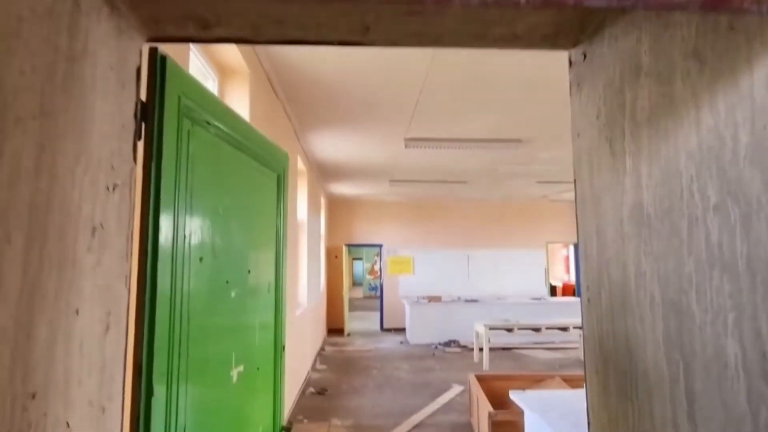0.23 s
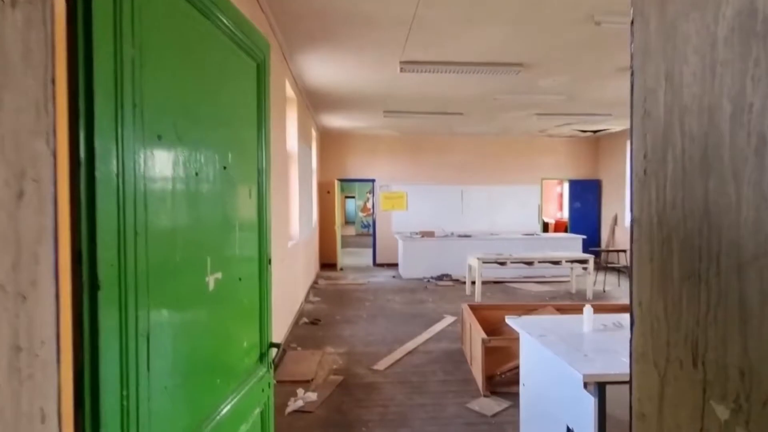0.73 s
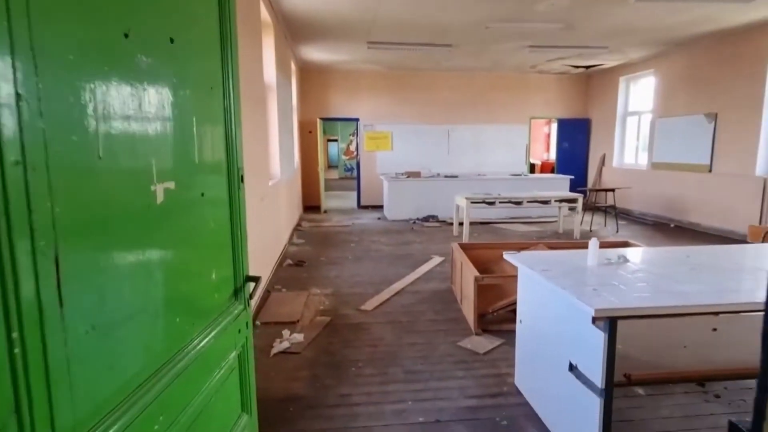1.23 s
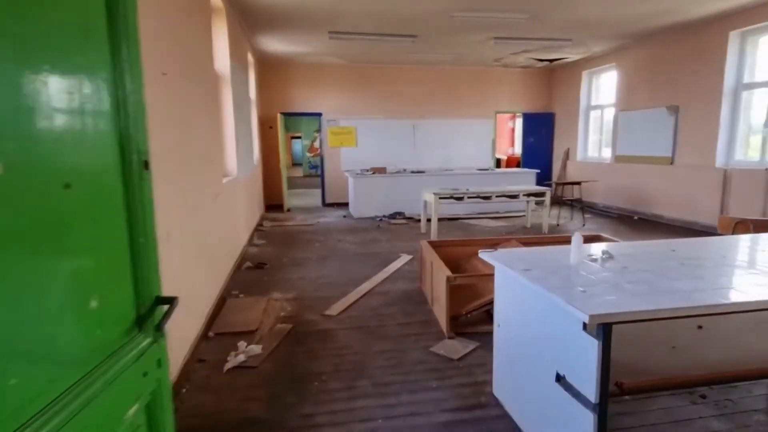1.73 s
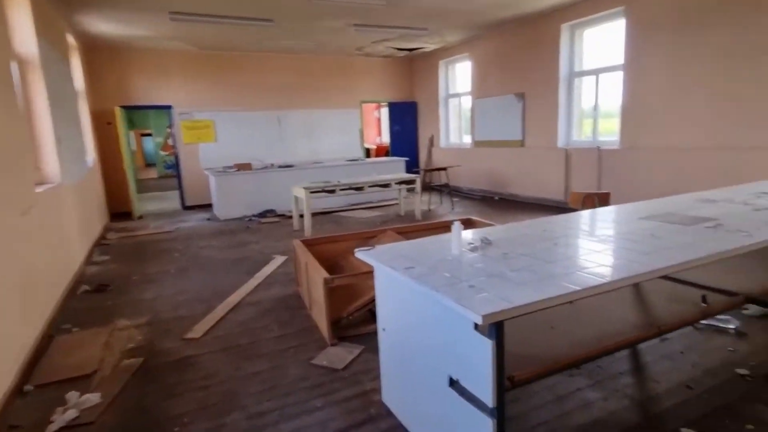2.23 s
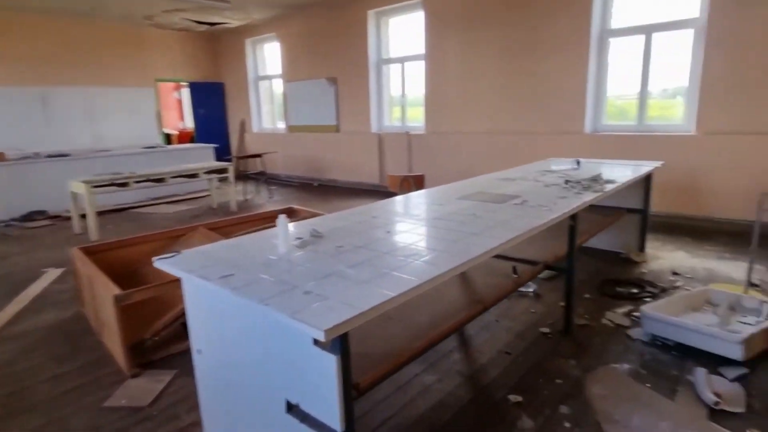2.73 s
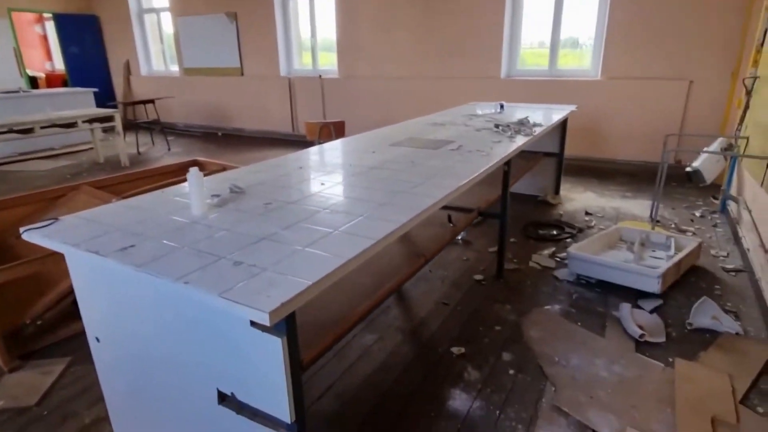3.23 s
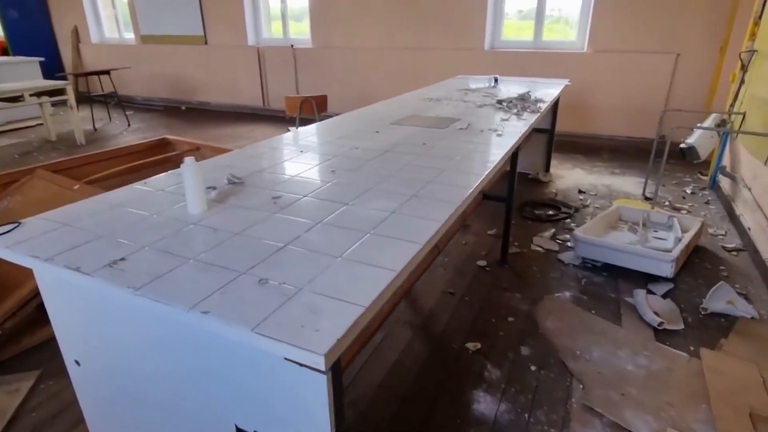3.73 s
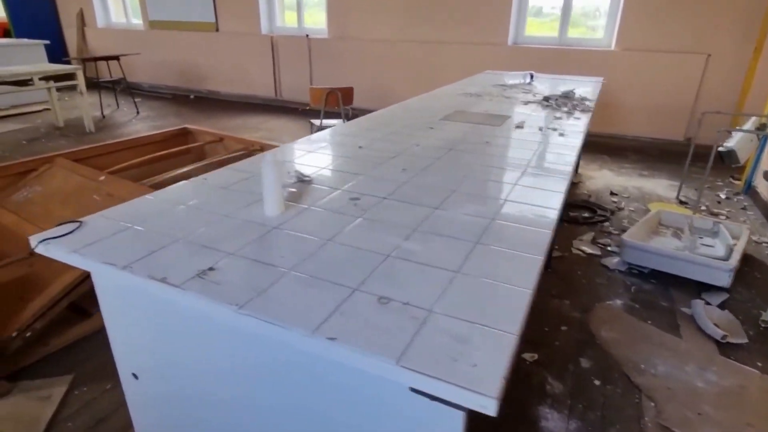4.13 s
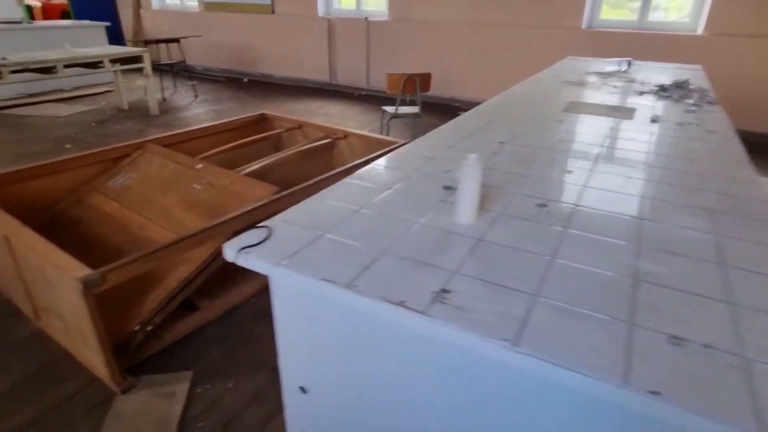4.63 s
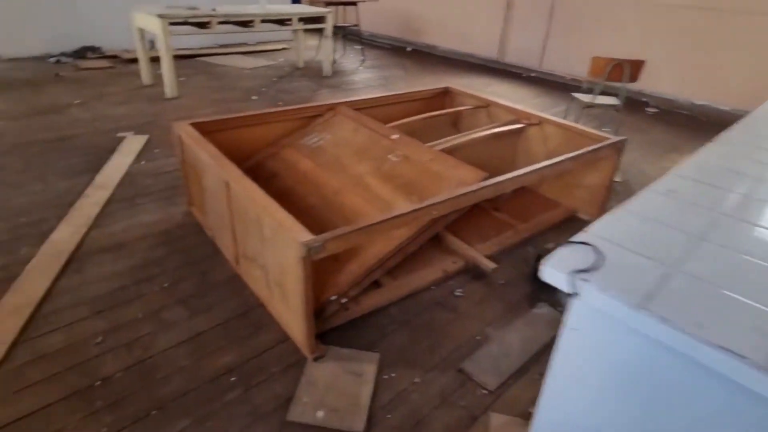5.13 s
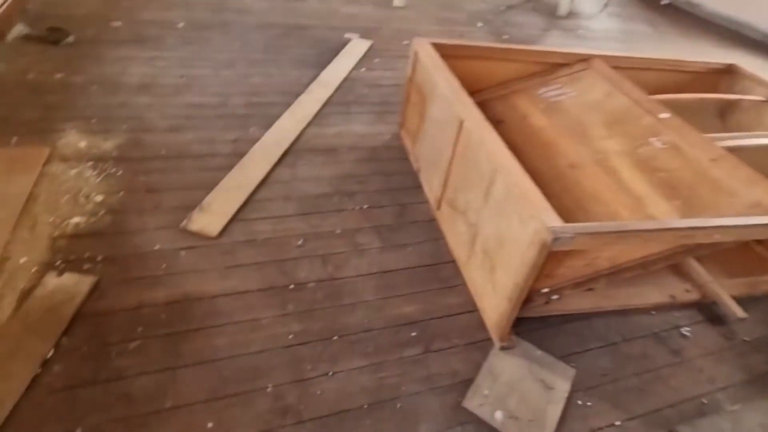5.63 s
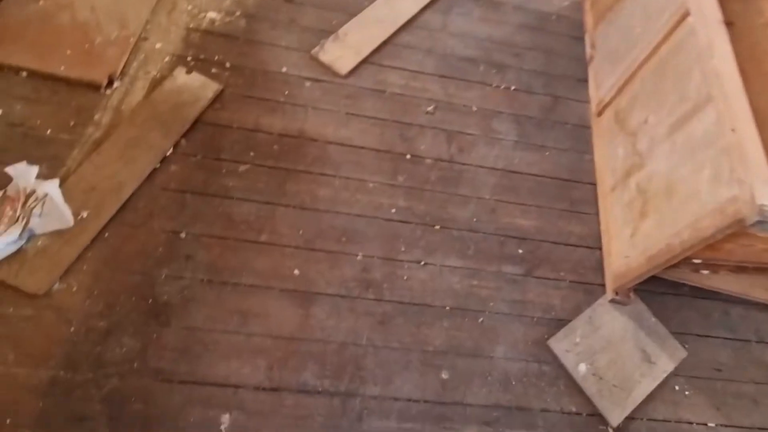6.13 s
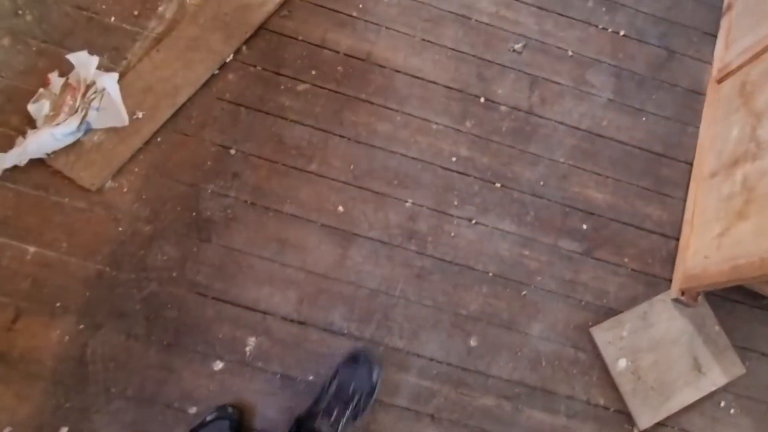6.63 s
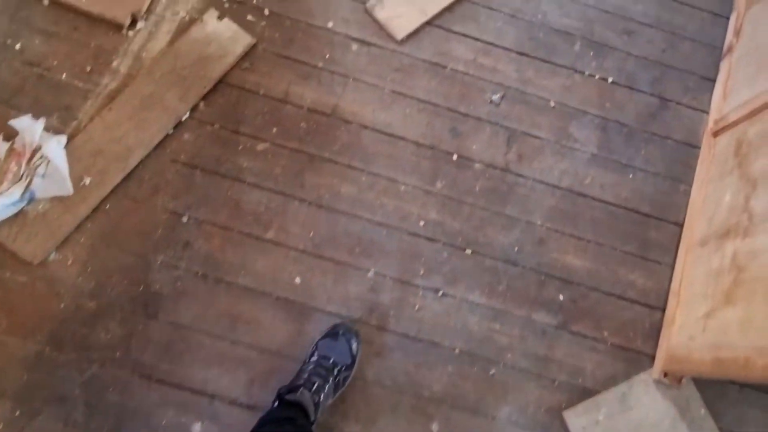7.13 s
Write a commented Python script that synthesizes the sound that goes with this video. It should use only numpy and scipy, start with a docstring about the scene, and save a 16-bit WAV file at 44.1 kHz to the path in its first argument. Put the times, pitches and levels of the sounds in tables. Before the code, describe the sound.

Someone walks through an echoing abandoned room: faint sliding soles and clothes rustle, booming plank knocks, sharp wooden clacks, then quieter steps and grit.

```python
"""Soft shuffling steps in a large empty room, then heavy ones on loose floorboards, then softer ones again.
Each footfall is a burst of noise for the knock on the floor and a decaying sine for the board under it.
Filtered noise makes the sliding soles, clothes, scrapes and room air; tiny bursts make grit and cracking joints.
Bare walls answer for about a second with fading noise. The bass is nearly mono, the treble is spread."""
import sys
import numpy as np
from scipy import signal
from scipy.fft import rfft, irfft, next_fast_len
from scipy.io import wavfile
from scipy.ndimage import uniform_filter1d, map_coordinates

SR = 44100
rng = np.random.default_rng(int(sys.argv[2]) if len(sys.argv) > 2 else 0)


def generate_wav(sig):
    """Save sig (samples, or channels by samples) to the path in sys.argv[1] as 16-bit PCM at SR."""
    pcm = np.round(np.clip(np.atleast_2d(sig).T, -1, 1) * 32767).astype(np.int16)
    wavfile.write(sys.argv[1], SR, pcm)


N = 326340  # length in samples

# Spectrum of the quiet room. Each row: frequency in Hz, relative density in dB per Hz.
AIR_SPECTRUM = [(25, -14), (65, 5.5), (110, -6), (220, -5.5), (480, -11.5), (800, -18), (1300, -20),
                (2200, -28), (4000, -32.5), (9000, -35), (15800, -38)]
# Stereo spread of the room air. Each row: frequency in Hz, side gain in dB.
AIR_SIDE_GAIN = [(200, -48), (1100, -38), (2000, -23), (3200, -14), (5000, -9), (10000, -4), (14000, -8)]
# Stereo spread of the steps and slides. Each row: frequency in Hz, side gain in dB.
STEP_SIDE_GAIN = [(200, -50), (1400, -42), (2800, -26), (4500, -11), (9000, -2), (14000, -6)]

# Decay of the room. Each row: frequency in Hz, time to fall by 60 dB in seconds.
ROOM_DECAY = [(80, 1.82), (200, 0.6), (500, 1.096), (1500, 0.96), (3500, 0.91), (7000, 0.75), (14000, 0.17)]
# Strength of the echo off the walls. Each row: frequency in Hz, relative level in dB.
WALL_ECHO = [(60, -15), (130, 11), (300, -1.5), (700, 2.5), (2000, 0.5), (6000, -1.5), (14000, 12)]

# A foot slides and the clothes move with it.
# Each row: start in seconds, length in seconds, sole level in dB, rustle level in dB, both before a common trim.
SLIDES = [(0, 0.2, -51.5, -57.5), (0.37, 0.17, -55.5, -53), (0.862, 0.038, -54, -48.5),
          (1.02, 0.13, -53.5, -55), (1.184, 0.14, -59, -51), (1.31, 0.073, -50, -67),
          (1.603, 0.12, -56.5, -70), (1.745, 0.035, -67, -52), (1.835, 0.12, -48.5, -53.5),
          (1.98, 0.11, -74, -52.5), (2.492, 0.2, -45.5, -56), (2.753, 0.19, -41.5, -47.5),
          (3.22, 0.78, -50, -55.5), (5.22, 0.39, -53, -56), (5.558, 0.026, -46, -55.5),
          (5.894, 0.13, -55.5, -83), (6.24, 0.18, -58, -59), (6.733, 0.21, -50, -85),
          (7.224, 0.045, -63, -78)]
# Spectrum of the sliding sole. Each row: frequency in Hz, relative density in dB per Hz.
SOLE_SPECTRUM = [(71, -32), (120, 5), (248, -2.5), (323, 2.5), (358, -12.5), (479, 3.5), (940, -9.5),
                 (2500, -32.5), (3250, -60), (5500, -120)]
# Spectrum of the clothes. Each row: frequency in Hz, relative density in dB per Hz.
RUSTLE_SPECTRUM = [(900, 11), (2300, 3), (4000, -4), (7500, -9), (11000, -13), (16000, -26.5)]
SLIDE_ATTACK_S, SLIDE_FADE_DB_PER_S = 0.023, 54.5

# Hollow scrapes of a dragged sole. Each row: start in seconds, length in seconds, level in dB.
SCRAPES = [(1.28, 0.55, -52), (6.757, 0.5, -58.5)]
# Resonances of the boards under a scrape. Each row: pitch in Hz, width in Hz, relative level in dB.
SCRAPE_MODES = [(470, 50, 2), (760, 130, 2.5), (1370, 150, -3)]

# Slaps and scrapes of the sole as it settles.
# Each row: start in seconds, level in dB, stroke length in seconds, pitch in Hz.
SCUFFS = [(0.372, -60.5, 0.17, 2620), (0.882, -52.5, 0.048, 580), (0.884, -60, 0.026, 2200),
          (1.196, -65, 0.045, 4200), (1.971, -59.5, 0.015, 4750), (2.048, -57, 0.025, 1970),
          (2.733, -36.5, 0.023, 550), (2.751, -42, 0.015, 1400), (2.787, -39.5, 0.048, 593),
          (3.07, -50, 0.0056, 3230), (3.07, -43, 0.012, 1085), (3.094, -44.5, 0.029, 1070),
          (3.371, -49, 0.011, 1060), (3.4, -53.5, 0.052, 960), (3.701, -28, 0.0046, 910),
          (4.527, -21.5, 0.0073, 654), (4.562, -39.5, 0.16, 1600), (5.176, -24, 0.0031, 1400),
          (5.177, -41.5, 0.032, 1550), (5.181, -55, 0.027, 4150), (6.24, -41.5, 0.011, 810),
          (6.554, -45, 0.017, 667), (7.211, -49.5, 0.032, 620), (7.294, -55, 0.051, 575)]
SCUFF_WIDTH = 0.72  # bandwidth over pitch

# Crumbs cracking, and at 2.869 s one sharp tick close on one side. Each row: start in seconds, peak level in dB
# before a common lift, # left-minus-right level in dB, pitch in Hz, time constant in seconds.
GRIT = [(0.941, -47, 4, 3400, 0.0051), (1.191, -53, 11, 4500, 0.004), (1.773, -53.5, -1, 3900, 0.0064),
        (2.746, -42, -2, 3500, 0.0015), (2.869, -39, 9, 3900, 0.0024), (3.232, -39.5, -1, 3700, 0.0022),
        (3.32, -62, 1, 2600, 0.0015), (3.621, -45.5, 0.5, 2800, 0.0015), (4.838, -43, 1, 4800, 0.002),
        (5.522, -35.5, 0.5, 4800, 0.0016), (6.307, -45.5, 0, 3400, 0.0018)]
# Plank joints snapping. Each row: start in seconds, level in dB, pitch in Hz.
CRACKS = [(3.7005, -28, 3040), (3.836, -41.5, 3060), (4.5235, -31, 3750), (6.247, -45, 2340)]

# Footfalls, heel and sole. Each row: start in seconds, knock level in dB,
# softness of the contact in milliseconds, name of the board, board level in dB.
STEPS = [(1.05, -47, 0.92, "boom", -52), (1.136, -48.5, 0.54, "bump", -35),
         (1.324, -53, 0.34, "rap", -37.5), (2.057, -51, 0.15, "rap", -37.5), (2.294, -55, 1, "rap", -43),
         (2.730, -30, 0.57, "boom", -6), (2.735, -44, 0.29, "drum", -4.5), (2.751, -35, 0.1, "knock", -14),
         (2.796, -40, 0.46, "boom", -15.5), (2.871, -36, 0.082, "boom", -14),
         (3.070, -36.5, 0.13, "tock", -15), (3.079, -33, 0.43, "flex", -26),
         (3.148, -36.5, 0.79, "knock", -32), (3.371, -36.5, 0.23, "knock", -20.5),
         (3.38, -39, 0.28, "ring", -38), (3.414, -33, 0.96, "bump", -37), (3.452, -45.5, 0.13, "bump", -23),
         (3.700, -19, 0.078, "ring", -5.5), (3.703, -53, 0.18, "flex", -11.5),
         (3.837, -24.5, 0.24, "rap", -8.5), (3.839, -37, 0.19, "boom", -22),
         (3.854, -24.5, 0.84, "thud", -20), (4.402, -43.5, 0.48, "thud", -31),
         (4.443, -43.5, 0.067, "bump", -21), (4.453, -44, 0.49, "thud", -20.5),
         (4.5237, -17.5, 0.025, "ring", -16.5), (4.526, -17.5, 0.091, "clack", -3),
         (4.526, -29, 0.094, "clop", -6.5), (4.536, -22, 0.072, "clack", -10),
         (4.542, -31, 0.27, "thump", -11), (5.175, -21, 0.1, "knock", -9),
         (5.177, -33.5, 0.064, "clack", -12.5), (5.184, -27, 0.077, "rap", -12.5),
         (5.474, -35, 0.68, "knock", -28), (5.579, -43, 0.91, "knock", -24.5),
         (5.584, -40, 0.55, "rumble", -23), (6.158, -48, 0.21, "clack", -52),
         (6.184, -49.5, 0.2, "bump", -35), (6.234, -34, 0.16, "thump", -20),
         (6.236, -59, 0.21, "clack", -32.5), (6.373, -43, 0.24, "bump", -31.5),
         (6.559, -49.5, 0.17, "bump", -33), (7.186, -52, 0.31, "rumble", -26.5),
         (7.218, -44, 0.23, "ring", -39.5)]
# Ways the floorboards ring. Each name gives: pitch in Hz, time to fall by 60 dB in seconds.
BOARDS = {"rumble": (81, 0.091), "drum": (93.5, 0.12), "boom": (108, 0.17), "thud": (158, 0.25),
          "bump": (170, 0.081), "thump": (252, 0.078), "knock": (245, 0.085), "rap": (276.8, 0.092),
          "flex": (296, 0.094), "ring": (355, 0.15), "tock": (420, 0.023), "clop": (520, 0.026),
          "clack": (700, 0.028)}
# Colour of the floor's knock. Each row: frequency in Hz, relative level in dB.
WOOD_SPECTRUM = [(40, -16), (110, -10), (230, 2), (450, 0.5), (750, -3), (1100, -5.5), (2000, -10.5),
                 (3200, -15.5), (4300, -22), (8000, -27), (11000, -24.5), (15000, -26)]
# Upper resonances of the floor. Each entry: frequency in Hz.
FLOOR_MODES_HZ = [406, 712, 883, 960, 1121, 1290, 1437, 1577, 1666, 1856, 1993, 2263, 2380, 2605]
MODE_LIFT_DB, MODE_WIDTH_HZ = 2, 3.5

TOP_HZ = 15800  # upper band limit


def amp(db):
    """Decibels to gain."""
    return 10 ** (np.asarray(db) / 20)


def unit(x):
    """Scale to rms 1."""
    return x / np.sqrt(np.mean(x ** 2) + 1e-20)


def along(points, hz):
    """Read (Hz, value) points on a log frequency axis."""
    f, v = np.transpose(points)
    return np.interp(np.log(hz + 1), np.log(f + 1), v)


def wobble(rate, size=N):
    """A smooth random curve, rate knots a second."""
    knots = rng.standard_normal(int(size * rate / SR) + 4)
    return map_coordinates(knots, [np.arange(size) * rate / SR])


def colour(x, gain):
    """Causal minimum-phase filter whose gain is a function of frequency."""
    n = x.shape[-1]
    m = 2 * next_fast_len(n // 2 + SR // 10)
    log_gain = np.log(np.maximum(gain(np.fft.rfftfreq(m, 1 / SR)), 1e-6))
    # folding the cepstrum onto positive time makes the filter causal
    cepstrum = irfft(log_gain, m)
    cepstrum[1:m // 2] *= 2
    cepstrum[m // 2 + 1:] = 0
    return irfft(rfft(x, m) * np.exp(rfft(cepstrum)), m)[..., :n]


def band(pitch_hz, width):
    """Gain of a broad resonance with steep skirts; width is bandwidth over pitch."""
    return lambda hz: np.hypot(1, (hz / pitch_hz - pitch_hz / (hz + 1)) / width) ** -3


def noise(spectrum, patchy_db=0):
    """Mid and side noise of rms 1 with the given spectrum; its colour drifts in patches."""
    z = signal.stft(rng.standard_normal((2, N)), nperseg=512)[2]
    field = rng.standard_normal(z.shape[1:])
    field = uniform_filter1d(field, size=7, axis=0)   # smooth over frequency
    field = uniform_filter1d(field, size=12, axis=1)  # smooth over time
    patchy = signal.istft(z * amp(patchy_db * unit(field)), nperseg=512)[1][:, :N]
    return unit(colour(patchy, lambda hz: amp(along(spectrum, hz))))


def add(track, s, sound):
    """Mix a sound into the track at time s, in seconds."""
    part = track[:, round(s * SR):][:, :sound.shape[-1]]
    part += sound[:, :part.shape[-1]]


def echoes(build_s=0.022, first_echo_s=0.00074):
    """Mid and side of the room's answer: fading noise, treble dying soonest, drawn afresh for every sound."""
    hz, t, z = signal.stft(rng.standard_normal((2, SR)), SR, nperseg=256)
    strength_db = along(WALL_ECHO, hz)[:, None]
    decay_db = 60 * t / along(ROOM_DECAY, hz)[:, None]
    tail = signal.istft(z * amp(strength_db - decay_db), SR, nperseg=256)[1]
    # echoes thicken as more and more walls are reached
    since_first = np.maximum(np.arange(tail.shape[1]) / SR - first_echo_s, 0)
    return tail * (1 - np.exp(-since_first / build_s))


def in_room(direct, spread, wet_db):
    """Mid and side: the direct sound plus the echoes of what spreads out in all directions."""
    heard = signal.fftconvolve(spread[None], echoes(), axes=1)
    # wet_db sets the mid echo energy against the direct energy
    heard *= amp(wet_db) * np.linalg.norm(direct) / np.linalg.norm(heard[0])
    heard[0, :len(direct)] += direct
    return heard


def burst(envelope, gain, wet_db):
    """Many tiny contacts under an envelope, coloured by gain and heard in the room; direct energy 1."""
    contacts = envelope * rng.standard_normal(len(envelope))
    # even out the chance tilt of the noise so that gain alone sets the colour
    power = np.abs(rfft(contacts, SR)) ** 2  # one bin per Hz
    broad = np.abs(uniform_filter1d(power, size=300)) / power.mean()
    even = lambda hz: np.interp(hz, np.arange(len(broad)), broad + .05) ** -.5
    chatter = colour(contacts, lambda hz: gain(hz) * even(hz))
    one_contact = colour(signal.unit_impulse(len(envelope)), gain)
    return in_room(chatter / np.linalg.norm(chatter), one_contact, wet_db)


def air(level_db=-53.0):
    """The low rumble of the building and a thin hiss: coloured noise with a slight waver in level."""
    return amp(level_db + 0.58 * wobble(33)) * noise(AIR_SPECTRUM)


def shuffle(sole_db=-1, rustle_db=-1, grain_db=2.0):
    """Soles slide on dust and clothes rustle: noise starts quickly, holds and fades, in uneven little catches."""
    t = np.arange(N) / SR
    power = np.zeros((2, N))
    for s, length, slide_db, cloth_db in SLIDES:
        attack = np.clip((t - s) / SLIDE_ATTACK_S, 0, 1)
        stroke = attack * amp(-SLIDE_FADE_DB_PER_S * np.maximum(t - s - length, 0))
        power += (amp([[slide_db], [cloth_db]]) * stroke) ** 2
    slide, rustle = np.sqrt(power)
    slide = slide * amp(sole_db + 0.66 * wobble(35)) * noise(SOLE_SPECTRUM, patchy_db=2.0)
    cloth = unit(amp(grain_db * wobble(600)) * noise(RUSTLE_SPECTRUM, patchy_db=2.2))
    return slide + rustle * amp(rustle_db) * cloth


def hollow_scrape(attack_s=0.046, fade_db_per_s=22, release_db_per_s=70):
    """A dragged sole rubs the boards, which answer in a few narrow resonances."""
    stroke = np.zeros(N)
    for s, length, db in SCRAPES:
        t = np.arange(N) / SR - s
        fade_db = fade_db_per_s * np.maximum(t, 0)
        release_db = release_db_per_s * np.maximum(t - length, 0)
        stroke += np.clip(t / attack_s, 0, 1) * amp(db - fade_db - release_db)

    def boards_gain(hz):
        return sum(amp(level) * band(pitch, width / pitch)(hz) for pitch, width, level in SCRAPE_MODES)

    rubbing = unit(colour(rng.standard_normal((2, N)), boards_gain))
    return amp(0.83 * wobble(25.4)) * stroke * rubbing


def rub(length, pitch_hz, width, grain_db=2.0):
    """A gritty stroke that swells quickly and fades, through one resonance; length in seconds."""
    t = np.arange(SR * 2 // 3) / SR
    u = t[t < 4 * length + .03] / length
    stroke = u * np.exp(-np.pi * u) * amp(grain_db * wobble(630, size=len(u)))
    return np.sqrt(length * SR) * burst(stroke, band(pitch_hz, width), wet_db=-8.5)


def scuffs():
    """Broad slaps and scrapes of the soles: each is one rub through its own resonance."""
    track = np.zeros((2, N))
    for s, db, length, pitch_hz in SCUFFS:
        add(track, s, amp(db) * rub(length, pitch_hz, SCUFF_WIDTH))
    return track


def grit(level_db=4, width=2.9, dull_hz=8000, floor_hz=1100, floor_db=0):
    """Crumbs of plaster crack close by under the soles, and one sharp tick sounds close on one side; each
    unevenly coloured and panned; left and right."""
    track = np.zeros((2, N))
    t = np.arange(SR // 20) / SR
    grid = np.arange(0, SR / 2, 450)
    for s, db, pan_db, pitch_hz, life in GRIT:
        ripple_db = 4.5 * rng.standard_normal(len(grid))

        def gain(hz):
            # the crumb snaps and taps the floor under it
            body = band(pitch_hz, width)(hz) + amp(floor_db) * band(floor_hz, width)(hz)
            return body * amp(np.interp(hz, grid, ripple_db)) / np.hypot(1, (hz / dull_hz) ** 2)

        mid, side = burst(t / life * np.exp(-t / life), gain, wet_db=-27.5)
        tick = np.array([mid + side / 2, mid - side / 2]) / np.abs(mid).max()
        pan = np.array([[pan_db], [-pan_db]]) / 2
        add(track, s, amp(db + level_db + pan) * tick)
    return track


def cracks(length_s=0.0017, width=0.49, wet_db=0):
    """Dry plank joints snap under the weight, each in one narrow resonance that carries through the room."""
    track = np.zeros((2, N))
    u = np.arange(SR // 20) / SR / length_s
    for s, db, pitch_hz in CRACKS:
        snap = burst(u * np.exp(-np.pi * u), band(pitch_hz, width), wet_db)
        add(track, s, amp(db) * np.sqrt(length_s * SR) * snap)
    return track


def floor_modes_db(hz):
    """Narrow peaks where the floor rings on after a blow."""
    return MODE_LIFT_DB * sum(1 / (1 + ((hz - f) / MODE_WIDTH_HZ) ** 2) for f in FLOOR_MODES_HZ)


def knock(t, softness_ms, landing_s=0.0028, rattle_t60=0.13, steep=2.83):
    """The heel lands and the joints chatter briefly; direct sound of rms 1 over a fiftieth of a second."""
    blow = (t / landing_s) ** 2 * np.exp(1 - (t / landing_s) ** 2)
    joints = .21 * np.exp(-np.log(1000) * t / rattle_t60)
    # a softer contact lasts longer and excites less treble
    corner_hz = 1000 / (2 * np.pi * softness_ms)
    # each spot of the floor has its own small resonances
    grid = np.arange(0, SR / 2, 60)
    ripple_db = 2.2 * rng.standard_normal(len(grid))

    def gain(hz):
        floor_db = along(WOOD_SPECTRUM, hz) + floor_modes_db(hz) + np.interp(hz, grid, ripple_db)
        return amp(floor_db) / np.sqrt(1 + (hz / corner_hz) ** (2 * steep))

    return burst(blow + joints, gain, wet_db=-0.5) * np.sqrt(SR / 50)


def board(t, pitch_hz, t60, rise_cycles=1.0, slap=0.41, cutoff=0.42):
    """The plank swings in its bending mode; touching the joist flattens one side of the swing."""
    decay = np.exp(-np.log(1000) * t / t60)
    rise = 1 - np.exp(-t * pitch_hz / rise_cycles)
    swing = -np.sin(2 * np.pi * pitch_hz * t) * decay * rise
    contact = np.abs(swing)
    # taking away the one-cycle mean leaves only the bend in the wave
    flattening = contact - uniform_filter1d(contact, int(SR / pitch_hz))
    motion = swing + slap * np.minimum(t * pitch_hz, 1) * flattening
    # little radiates below the plank's pitch
    return signal.lfilter(*signal.butter(2, cutoff * pitch_hz, "high", fs=SR), motion)


def footsteps():
    """Every footfall knocks the floor and rings the plank it lands on."""
    track = np.zeros((2, N))
    t = np.arange(SR // 4) / SR
    for s, knock_db, softness_ms, name, board_db in STEPS:
        plank = amp(board_db) * board(t, *BOARDS[name])
        add(track, s, amp(knock_db) * knock(t, softness_ms))
        add(track, s, in_room(plank, plank, wet_db=-7.5))
    return track


def scene(shuffle_side_db=-7):
    """All sources in left and right: mid and side, narrow in the bass and spread in the treble, plus grit."""
    air_mid, air_side = air()
    slides = shuffle() * np.array([[1], [amp(shuffle_side_db)]])
    mid, side = slides + hollow_scrape() + scuffs() + cracks() + footsteps()
    mid = mid + air_mid
    side = colour(side, lambda hz: amp(along(STEP_SIDE_GAIN, hz)))
    side = side + colour(air_side, lambda hz: amp(along(AIR_SIDE_GAIN, hz)))
    return np.array([mid + side, mid - side]) + grit()


def record(dry):
    """Cut everything from the band limit upwards."""
    m = next_fast_len(N + SR // 2)
    kept = np.fft.rfftfreq(m, 1 / SR) < TOP_HZ
    return irfft(rfft(dry, m) * kept, m)[:, :N]


dry = scene()
out = record(dry)
generate_wav(out)
```